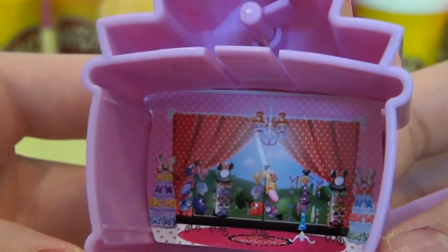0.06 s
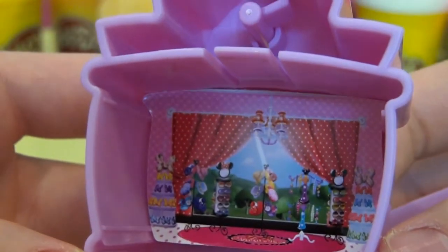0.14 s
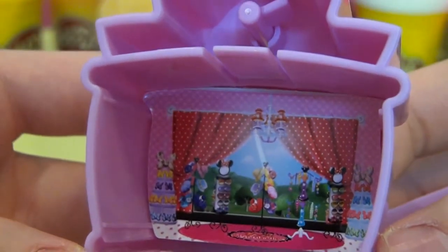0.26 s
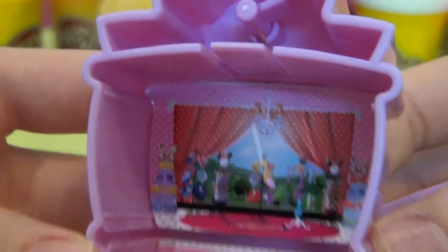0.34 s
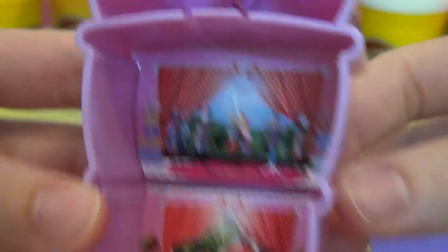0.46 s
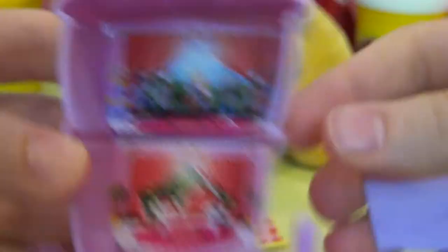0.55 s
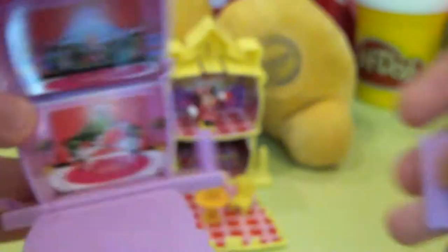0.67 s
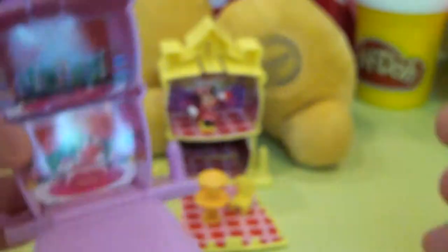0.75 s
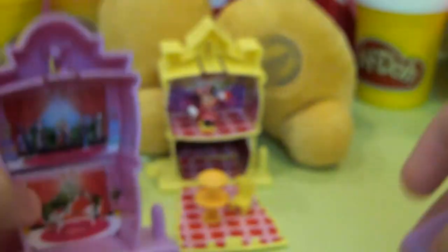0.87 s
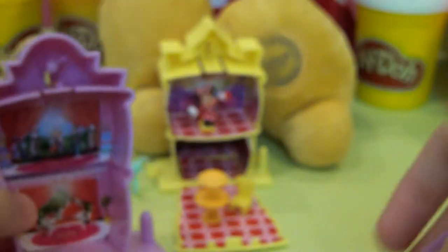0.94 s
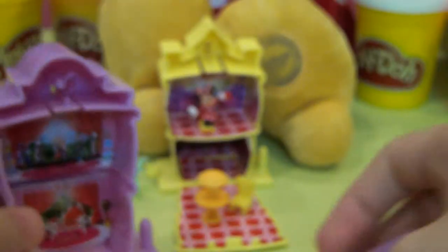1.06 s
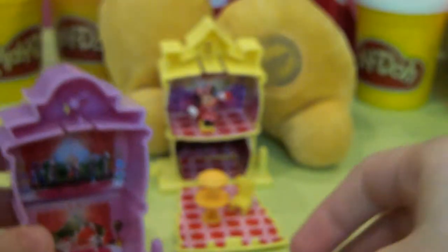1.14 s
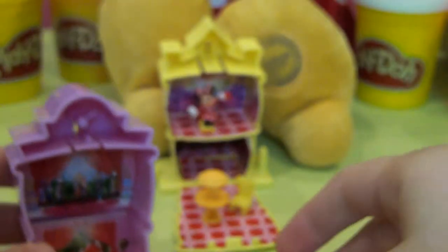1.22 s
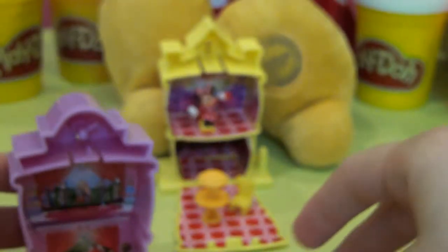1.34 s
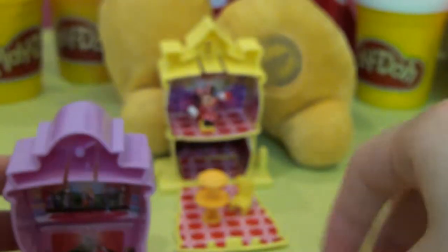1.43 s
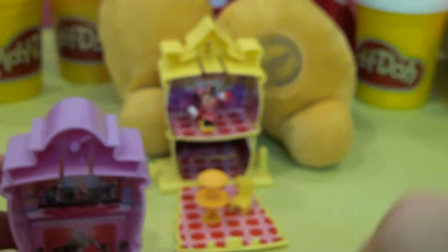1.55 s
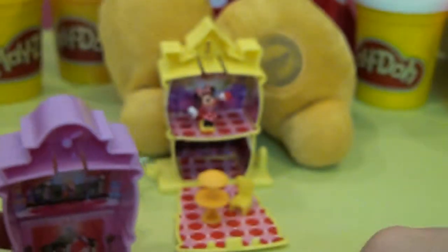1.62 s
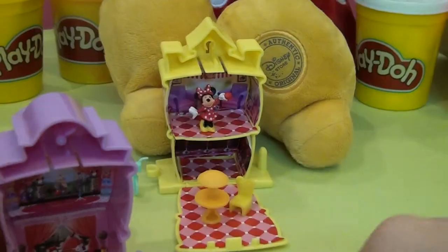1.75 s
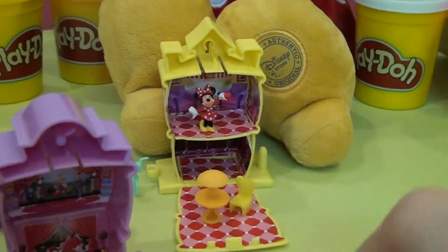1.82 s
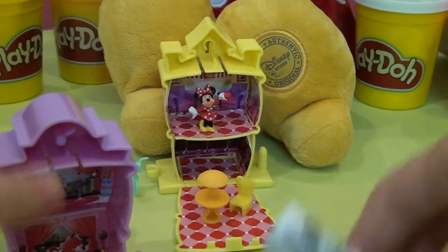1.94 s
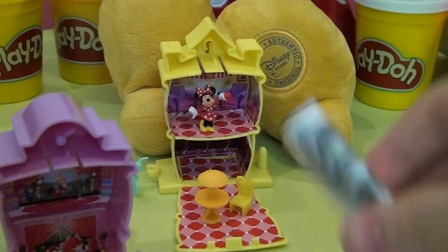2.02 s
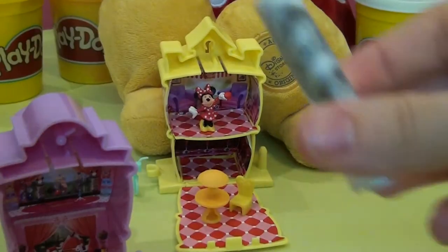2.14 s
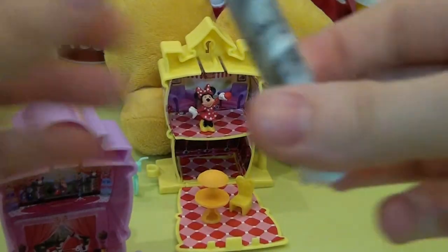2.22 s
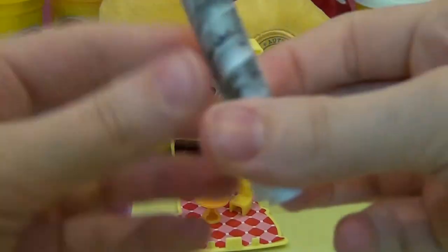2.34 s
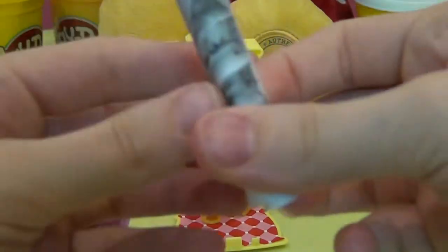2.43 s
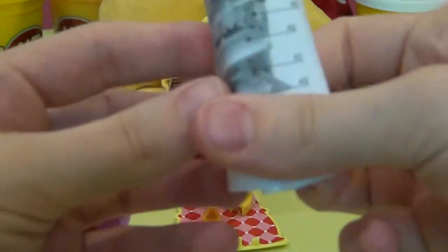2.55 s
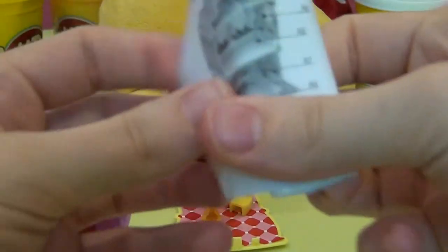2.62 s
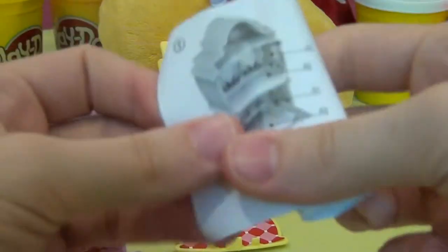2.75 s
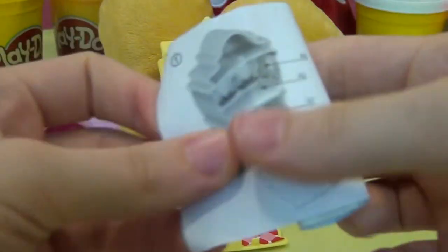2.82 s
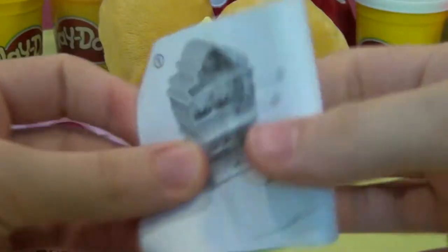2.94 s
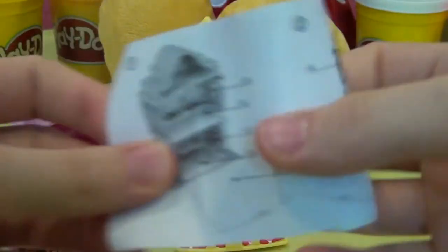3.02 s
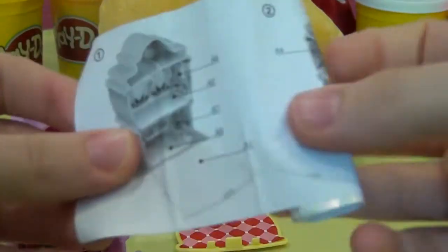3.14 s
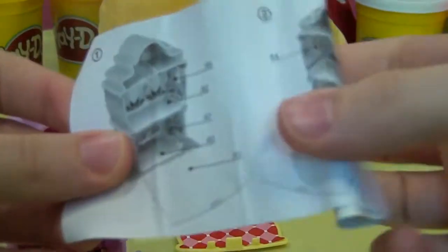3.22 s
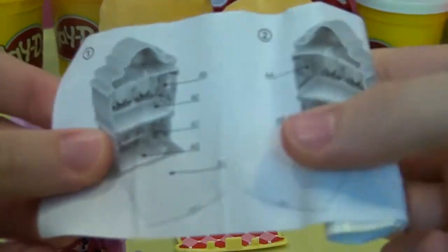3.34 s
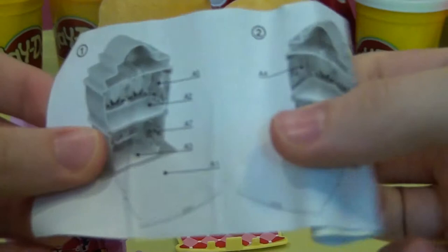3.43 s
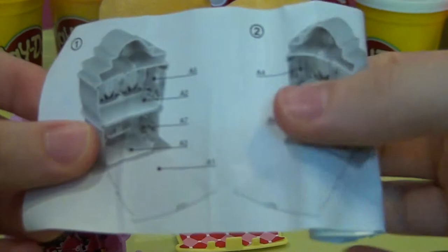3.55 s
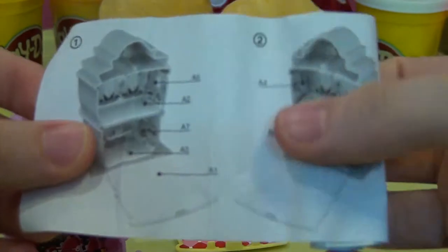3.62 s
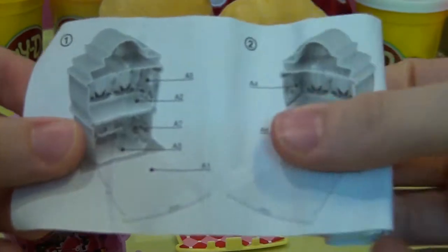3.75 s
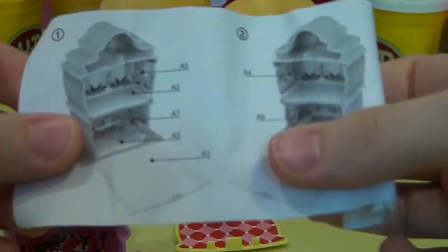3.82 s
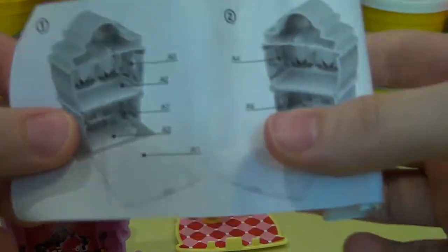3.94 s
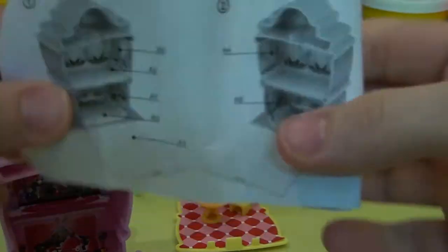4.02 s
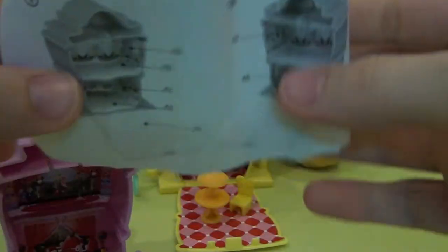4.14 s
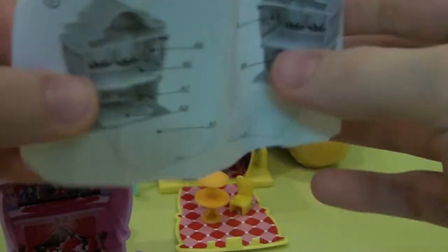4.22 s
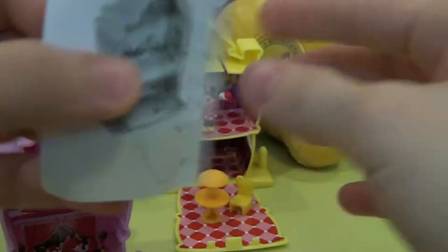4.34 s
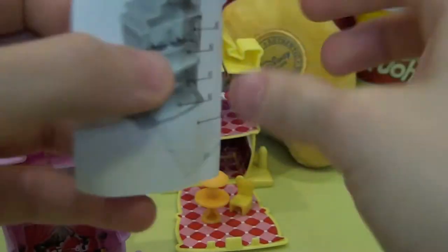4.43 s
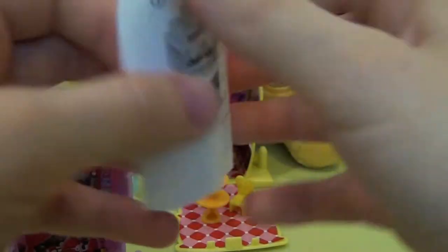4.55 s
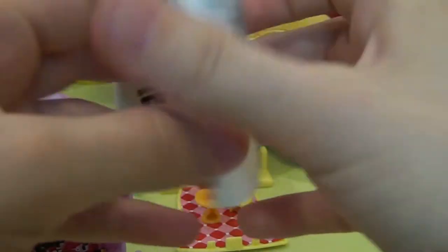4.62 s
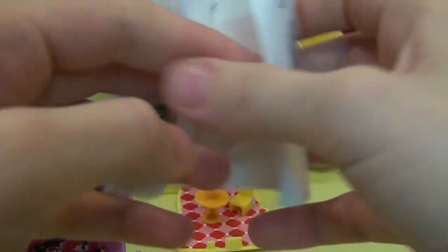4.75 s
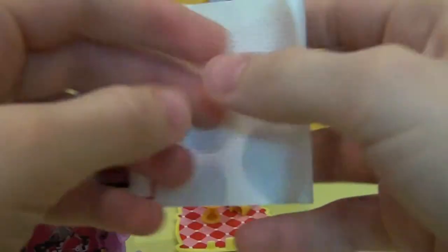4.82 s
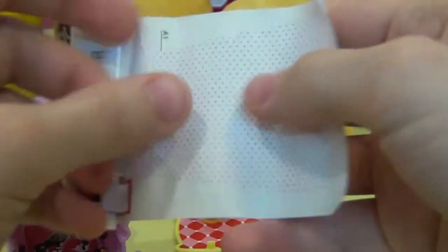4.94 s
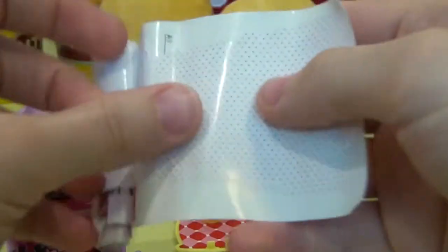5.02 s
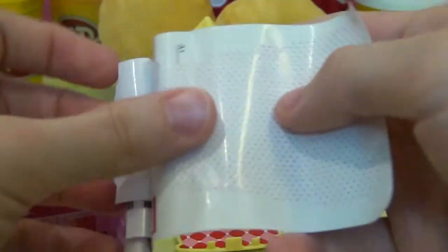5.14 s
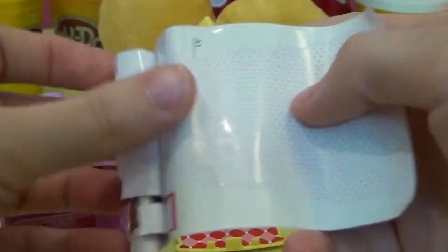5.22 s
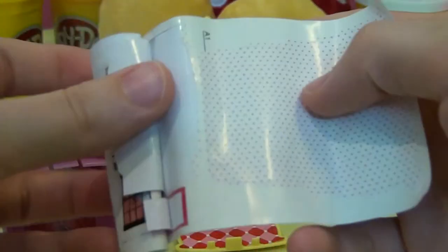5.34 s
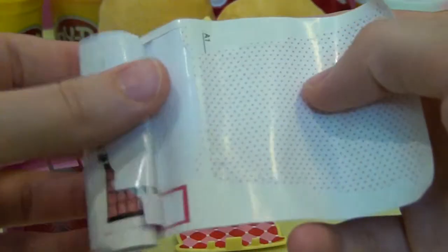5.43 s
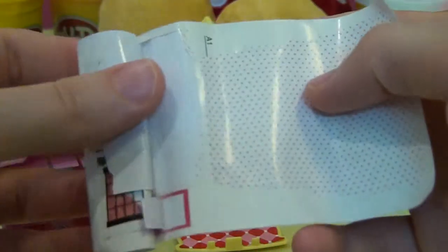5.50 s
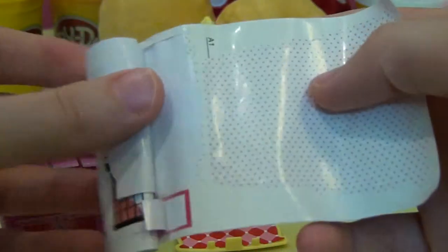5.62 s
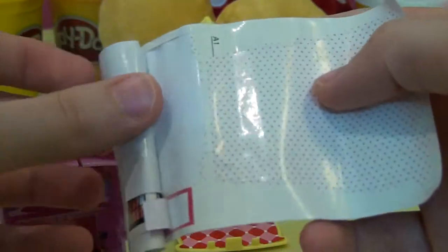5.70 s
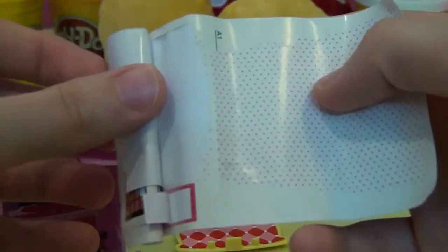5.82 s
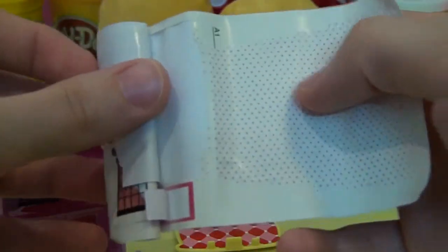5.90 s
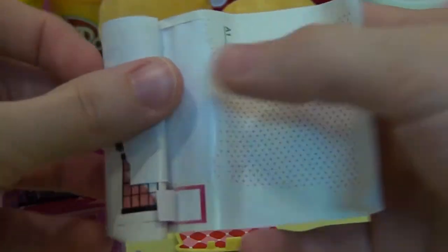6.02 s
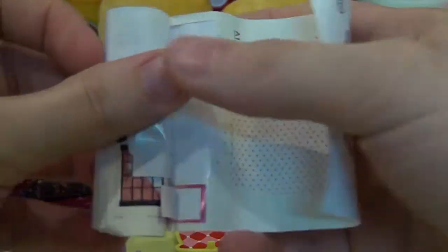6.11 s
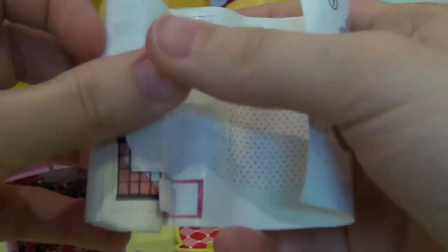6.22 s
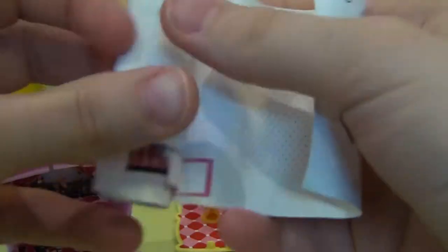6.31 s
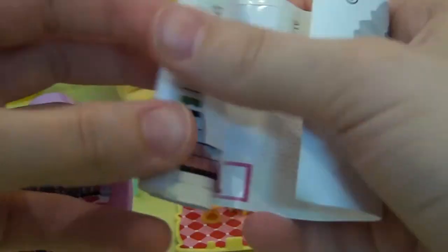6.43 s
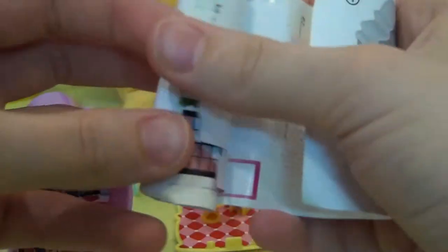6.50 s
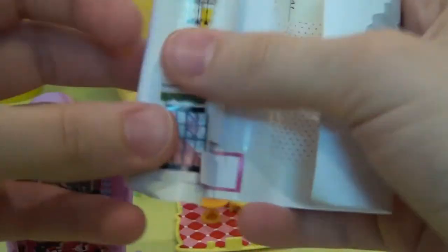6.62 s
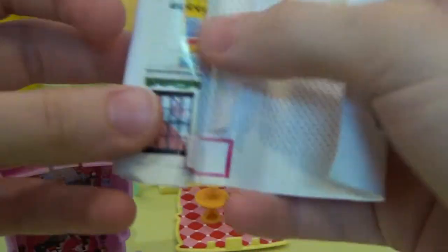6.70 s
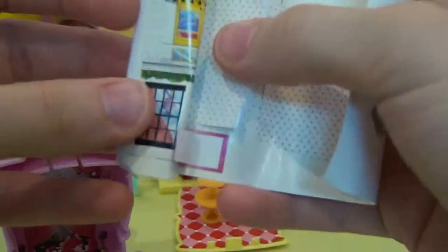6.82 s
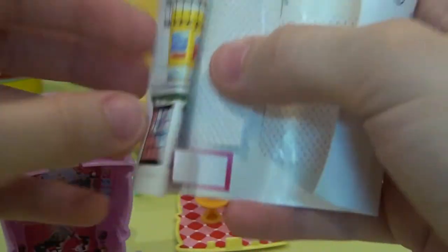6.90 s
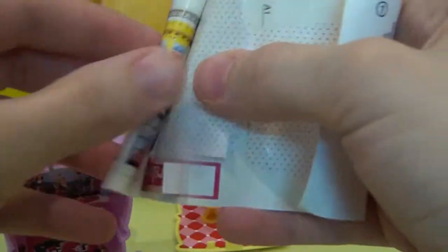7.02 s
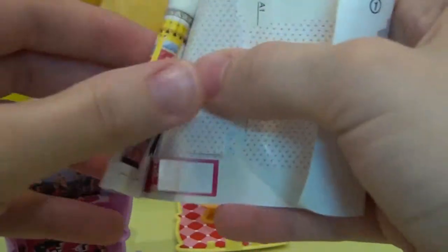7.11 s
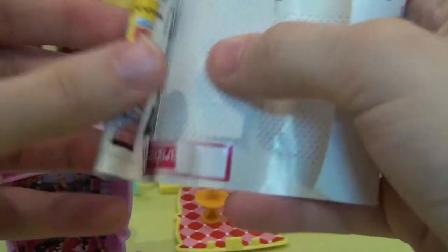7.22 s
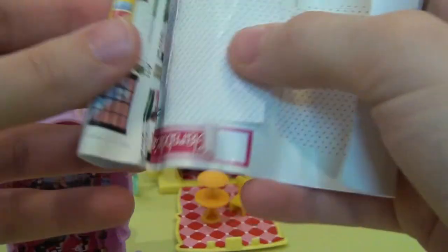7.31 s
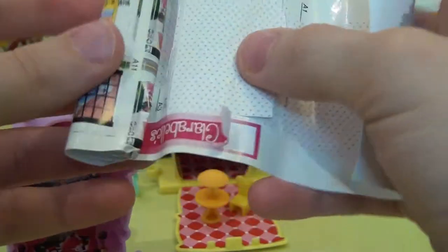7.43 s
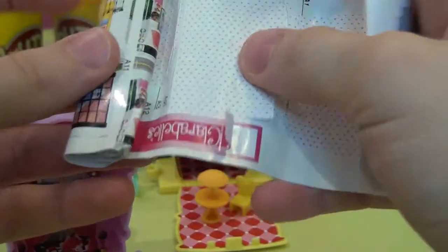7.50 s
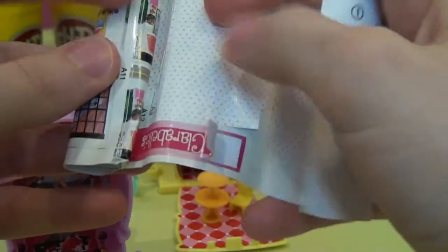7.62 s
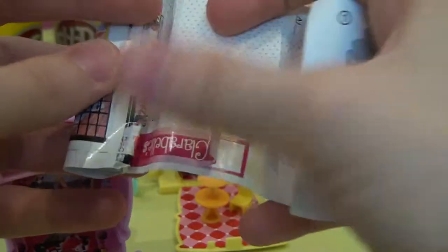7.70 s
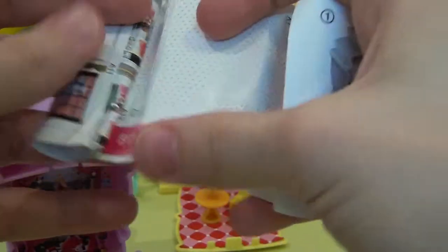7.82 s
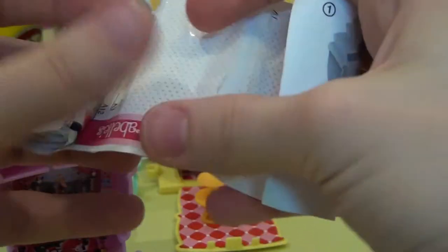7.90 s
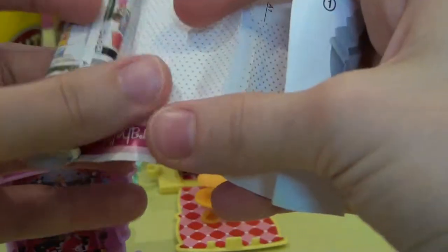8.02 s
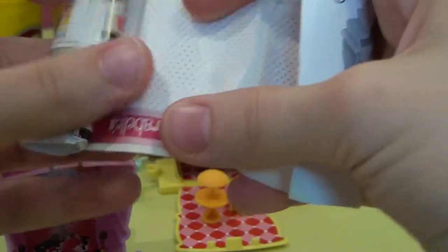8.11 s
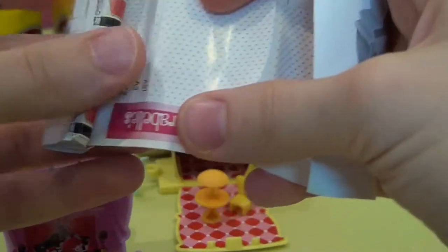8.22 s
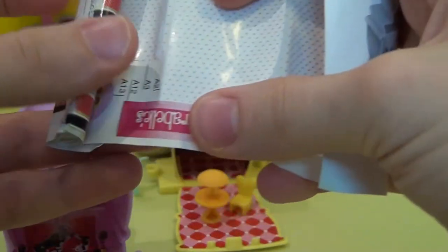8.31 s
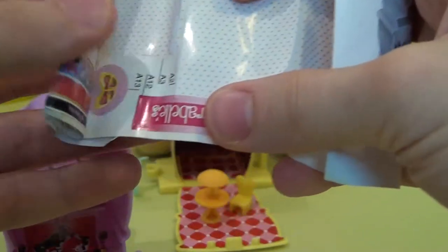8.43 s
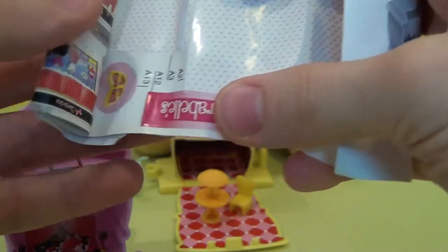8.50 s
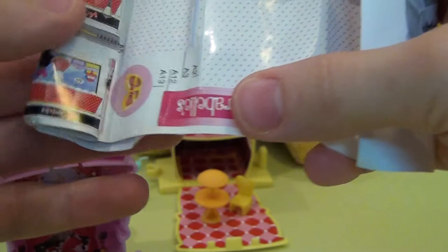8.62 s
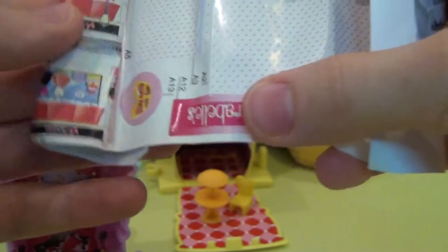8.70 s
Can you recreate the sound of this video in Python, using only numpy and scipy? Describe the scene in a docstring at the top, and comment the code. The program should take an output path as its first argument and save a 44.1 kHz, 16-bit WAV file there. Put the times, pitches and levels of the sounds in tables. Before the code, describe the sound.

Close handling sounds: faint plastic touches first, then a hard hollow clack and a cluster of rattles and scrapes as a small toy is set on a table. Next, stiff slick paper is unrolled and turned, crackling irregularly with bright pops, hissing finger slides and soft low flops until the end. Steady low room noise with hum and a thin high whine lies beneath; little reverberation.

```python
"""A quiet room, with a wavering low hum and a steady thin whine over smooth broadband noise.
Fingers shift on a hollow plastic toy, which is set down and pushed along a table: impacts excite the modes of
its shell, friction drags scrape and hum from it. Then fingers unroll a stiff paper sheet: buckling creases snap
and ring, skin and paper slide in hissing strokes made of many tiny slips, and the flopping sheet pushes air.
Small ticks sound throughout, and sparse dull echoes follow the near sources."""
import sys
import numpy as np
from scipy import signal
from scipy.io import wavfile
from scipy.ndimage import uniform_filter1d

SR = 44100
rng = np.random.default_rng(int(sys.argv[2]) if len(sys.argv) > 2 else 0)


def digitize_waveform(pressure):
    """Quantize a signal to 16-bit integers and store it at the path in sys.argv[1].

    Rows of a 2-D input are taken as channels; values are limited to [-1, 1].
    """
    field = np.atleast_2d(pressure).T
    bounded = np.clip(field, -1, 1)
    quanta = np.round(bounded * 32767).astype(np.int16)
    wavfile.write(sys.argv[1], SR, quanta)


N = 386316  # length in samples


def gain_of(db):
    """Decibel law: 20 dB is a factor of ten in amplitude."""
    return 10 ** (np.asarray(db) / 20)


def evened(x):
    """Normalisation to an rms of 1."""
    return x / np.sqrt(np.mean(x ** 2) + 1e-20)


def peaked(x):
    """Normalisation to a peak of 1."""
    return x / abs(x).max()


def add(mix, start_s, sound):
    """Superposition: the sound is added in place, cut at the end of the mix."""
    part = mix[round(start_s * SR):][:len(sound)]
    part += sound[:len(part)]


def bandpassed(x, order, edges_hz):
    """Band-pass filtering: only the part between two edges passes."""
    return signal.sosfilt(signal.butter(order, edges_hz, "bandpass", output="sos", fs=SR), x)


def read(points, hz):
    """Interpolation of a spectrum along a logarithmic frequency axis."""
    point_hz, value = np.transpose(points)
    return np.interp(np.log(hz + 1), np.log(point_hz + 1), value)


def colour(points):
    """Minimum phase: the Hilbert transform of the log spectrum gives a causal filter, here of energy 1."""
    hz = abs(np.fft.fftfreq(4096, 1 / SR))
    end = (points[-1][0] * 1.01, -90)  # the spectrum stops above its last point
    log_gain = np.log(gain_of(np.maximum(read(points + [end], hz), -90)))
    phase = -signal.hilbert(log_gain).imag
    taps = np.fft.ifft(np.exp(log_gain + 1j * phase)).real[:2048]
    return taps / np.linalg.norm(taps)


# spectrum of the room noise: pitch_hz [Hz], level_db [relative dB per Hz]
AIR_SPECTRUM = [(15, -43), (25, -18), (50, 0), (96, -4), (186, 4), (400, 2), (520, -4), (770, 0),
                (1700, -5), (2100, -5.5), (2900, -8.5), (5500, -9), (9300, -13.5), (15700, -17.5)]
# correlation of the room noise between left and right: pitch_hz [Hz], likeness [-1 to 1]
AIR_LIKENESS = [(60, 0.94), (180, 0.97), (550, 0.63), (1650, 0.72), (4970, 0.95), (15000, 1.0)]
# hum and whine: pitch_hz [Hz], level_db [dB rms]; the hum wavers about its level
TONES = [(59.2, -71.5), (118.4, -70), (2530, -63.5)]
AIR_DB = -55  # rms


def air():
    """Partial coherence: the channels share some of the room noise; a wavering hum and a steady whine join it."""
    frames, hz = N // 512 + 5, np.fft.rfftfreq(2048, 1 / SR)
    a, b, c, d = rng.standard_normal((frames, 1025, 4)).T
    left, other = a + 1j * b, c + 1j * d
    same = np.clip(read(AIR_LIKENESS, hz), -1, 1)[:, None]
    right = same * left + np.sqrt(1 - same ** 2) * other
    spectra = np.array([left, right]) * gain_of(read(AIR_SPECTRUM + [(15850, -80)], hz)[:, None])
    out = gain_of(AIR_DB) * evened(signal.istft(spectra, nperseg=2048, noverlap=1536)[1][:, :N])
    t = np.arange(N) / SR
    for pitch_hz, level_db in TONES:
        waver = evened(uniform_filter1d(rng.standard_normal(N), size=6000))
        waver_db = 2.3 * waver * (pitch_hz < 500)  # only the hum wavers
        tone = np.sin(2 * np.pi * (pitch_hz * t + rng.random()))
        out += np.sqrt(2) * gain_of(level_db + waver_db) * tone
    return out


def friction(per_s, spread_db, flutter_db, flutter_s, patchy_db):
    """Stick-slip: tiny uneven slips come in clumps; their colour drifts in patches as the contact moves."""
    clumps = evened(uniform_filter1d(rng.standard_normal(N), size=max(2, int(flutter_s * SR))))
    sizes = gain_of(spread_db * np.minimum(rng.exponential(1, N), 6) + flutter_db * clumps)
    slips = sizes * rng.standard_normal(N) * (rng.random(N) < per_s / SR)
    spectra = signal.stft(slips, nperseg=256)[2]
    patches = rng.standard_normal(spectra.shape[::-1]).T
    for _ in range(2):
        patches = uniform_filter1d(uniform_filter1d(patches, size=4, axis=0), size=9, axis=1)
    drift = uniform_filter1d(uniform_filter1d(patches, size=10, axis=0), size=30, axis=1)  # broad, slow
    spectra = spectra * gain_of(patchy_db * (evened(patches) + evened(drift)))
    return evened(signal.istft(spectra, nperseg=256)[1][:N])


def toy_friction():
    """Stick-slip of the toy's plastic surface."""
    return friction(per_s=24000.0, spread_db=2.5, flutter_db=2.5, flutter_s=0.005, patchy_db=2.5)


def slide(rows, slips, bodies, edge_db, fade_db_per_s, linger_db, pitch_share):
    """Source and filter: slips swell, stop and linger faintly; a narrow resonance at the row's pitch colours them."""
    out, t = np.zeros(N), np.arange(N) / SR
    for middle, rise, fall, hz, *dbs in rows:
        first = max(0, int((middle - rise - .2) * SR))
        part = slice(first, int((middle + fall + .2) * SR))
        now = t[part]
        place = (now - middle) / np.where(now < middle, rise, fall)  # -1 at the start, 1 at the end
        past = np.maximum(np.maximum(middle - rise - now, now - middle - fall), 0)  # s outside the stroke
        swell = gain_of(-edge_db * np.minimum(abs(place) ** 2.22, 1) - fade_db_per_s * past)
        shape = swell + gain_of(linger_db - np.where(place < 0, 600., 80.) * past)
        layers = []
        for db, slip, body in zip(dbs, slips, bodies):
            shaped = shape * slip[part]
            level = gain_of(db) * np.linalg.norm(shape) / np.linalg.norm(shaped)
            layers.append(signal.oaconvolve(level * shaped, body)[:len(past)])
        rustle, hiss, low = layers
        pitched = signal.lfilter(*signal.butter(1, [hz / 1.08, hz * 1.104], "bandpass", fs=SR), rustle)
        mixed = (1 - pitch_share) * rustle + pitch_share * pitched * np.std(rustle) / np.std(pitched)
        add(out, first / SR, mixed * np.std(rustle) / np.std(mixed) + hiss + low)
    return out


# modes of the shell (below 4500 Hz) and its small parts (above): pitch_hz [Hz], level_db [relative dB], t60_s [s]
TOY_MODES = [(336, -13, 0.68), (442, -5, 0.33), (473, -3.5, 0.18), (512, 5, 0.12), (580, -2.5, 0.08),
             (679, -2.5, 0.089), (785, 18, 0.013), (1293, 3.5, 0.031), (1700, -1, 0.024),
             (2250, 4.5, 0.047), (2800, 0.5, 0.026), (3845, -4.5, 0.041), (5195, 0, 0.066),
             (5700, 8, 0.0077), (7150, -8, 0.04), (7850, -9, 0.04), (8340, -7, 0.04), (9500, -13, 0.019)]


def toy_modes(t):
    """Modal decay: every mode is a damped sine; also tells which modes belong to the small parts."""
    modes = [gain_of(db - 60 * t / t60) * np.sin(2 * np.pi * hz * t) for hz, db, t60 in TOY_MODES]
    small = [hz > 4500 for hz, db, t60 in TOY_MODES]
    return np.array(modes), np.array(small)


# spectrum of plastic scraping: pitch_hz [Hz], level_db [relative dB per Hz]
SCRAPE = [(710, -21), (1250, -1), (2210, -4), (2570, -1.5), (3000, -6.5), (3700, -7.5), (4700, -8),
          (6300, -10), (8000, -40)]
# spectrum of bright hiss, for the toy and the paper: pitch_hz [Hz], level_db [relative dB per Hz]
HISS = [(4500, -36), (6500, -11.5), (8500, 1), (10300, -4), (11500, -12), (12400, -17.5), (14500, -13),
        (15700, -14)]
# fingers on the lifted toy: middle_s [s], half_length_s [s], pitch_hz [Hz], scrape_db [dB], shell_hum_db [dB]
TOUCHES = [(0.365, 0.018, 5030, -57, -69), (0.535, 0.0088, 3530, -54.5, -72.5),
           (0.678, 0.013, 5940, -56.5, -76), (0.71, 0.011, 1700, -52.5, -77),
           (0.885, 0.022, 1600, -58, -52.5)]
TOUCH_HISS_DB, TOUCH_HISS_PER_OCTAVE = -4.5, 3.6  # over the scrape; low touches hiss less
RUSTLE_HZ = 2595  # narrow resonance shared by all paper strokes; the touches' hiss is set relative to its octave


def touches():
    """Light damping: fingers shift on the toy held in the hand, where only its lowest mode hums."""
    t = np.arange(6000) / SR
    a, b = toy_friction(), toy_friction()
    free = toy_modes(t)[0][0] * gain_of(-60 * t / 0.088)
    bodies = colour(SCRAPE), colour(HISS), free / np.linalg.norm(free)
    rows = []
    for middle, half, hz, scrape_db, hum_db in TOUCHES:
        hiss_db = scrape_db + TOUCH_HISS_DB + TOUCH_HISS_PER_OCTAVE * np.log2(hz / RUSTLE_HZ / 2)
        rows.append((middle, half, half, hz, scrape_db, hiss_db, hum_db))
    return slide(rows, (a, a, b), bodies, edge_db=18.0, fade_db_per_s=520.0, linger_db=-33.0, pitch_share=0.96)


# edges and fingertips that let go: start_s [s, sounded 0.4 ms early], level_db [dB peak of pitched part], pitch_hz [Hz]
TICKS = [(.857, -39, 7800), (2.091, -34, 8800), (2.806, -33, 3000), (2.814, -38, 8000), (2.827, -33, 2500),
         (2.996, -33.5, 2620), (3.872, -30, 4500), (4.034, -29.5, 2700), (4.071, -27, 2720),
         (6.956, -33, 900), (2.565, -39, 8000), (2.638, -36, 5200), (2.650, -28, 8500), (2.663, -42, 6500),
         (2.745, -33, 900), (2.821, -34, 8000), (2.833, -33.5, 2520), (2.935, -32.5, 2200),
         (3.671, -27.5, 2690), (4.3, -29, 2000), (4.503, -40, 4020), (4.617, -38, 8000),
         (4.669, -36.5, 2480), (4.69, -40, 4000), (4.718, -35, 2500), (4.73, -37, 5000), (4.757, -33, 4940),
         (4.878, -37, 1870), (5.311, -33, 9000), (5.468, -33, 7000), (5.998, -33, 2520), (6.074, -24, 875),
         (6.375, -35, 5000), (7.241, -34.5, 4500), (7.47, -29.5, 3540), (7.593, -33, 2190),
         (7.786, -33, 3200), (7.815, -34, 2900)]
TICK_S, TICK_OCTAVES, TICK_WIDE_DB = 0.0082, 1.06, -6  # t60 in s, width of the pitch, broad part over the peak


def ticks():
    """Impulsive release: short bursts of grit around a pitch, with a weaker broad click."""
    out, t = np.zeros(N), np.arange(600) / SR
    for (start_s, level_db, hz), grit in zip(TICKS, rng.standard_normal((len(TICKS), len(t)))):
        burst = grit * gain_of(-60 * t / TICK_S)
        edges_hz = hz * 2 ** (TICK_OCTAVES * np.array([-.5, .5]))
        pitched = signal.lfilter(*signal.butter(2, edges_hz, "bandpass", fs=SR), burst)
        click = peaked(np.diff(burst, prepend=0))
        add(out, start_s - .0004, gain_of(level_db) * (peaked(pitched) + gain_of(TICK_WIDE_DB) * click))
    return out


# spectrum of a knock's bright tick: pitch_hz [Hz], level_db [relative dB per Hz]
CRACK = [(1500, 0), (2940, 3), (5000, -15), (7280, 4.5), (8560, 3), (11000, 1.5), (12300, -19), (14200, -8),
         (15700, -10), (16800, -40)]
# toy meets table: start_s [s], and peaks before the bass cut: knock_db [dB], tick_db [dB], rattle_db [dB]
KNOCKS = [(1.2612, -5, -11, -23.5), (1.311, -24, -18, -32), (1.358, -20.5, -27, -39),
          (1.39, -27, -5.5, -41), (1.4067, -23, -6.5, -15), (1.425, -17, -20, -20), (1.447, -38, -31, -13),
          (1.453, -15.5, -18, -31), (1.458, -39, -27, -11), (1.465, -18, -27, -28), (1.469, -45, -6, -15),
          (1.488, -50, -38, -16), (1.507, -37, -28, -18), (1.525, -26, -40, -20), (1.578, -10, -35, -40),
          (1.589, -12, -10.5, -31), (1.612, -11.5, -42, -45), (1.876, -51, -23.5, -58)]


def knocks():
    """Impact excitation: each knock rings the shell, ticks, and rattles the small parts."""
    t = np.arange(6000) / SR
    modes, small = toy_modes(t)
    out, bright = np.zeros(N), colour(CRACK)
    spots = gain_of(2.5 * rng.standard_normal((len(KNOCKS), len(TOY_MODES))))  # each knock lands on another spot
    grits = rng.standard_normal((len(KNOCKS), 600))
    for (start_s, knock_db, tick_db, rattle_db), spot, grit in zip(KNOCKS, spots, grits):
        short = grit * gain_of(-60 * t[:600] / 0.0085)
        long = grit * gain_of(-60 * t[:600] / 0.015)
        add(out, start_s, gain_of(knock_db) * peaked((spot * ~small) @ modes))
        add(out, start_s, gain_of(tick_db) * peaked(signal.oaconvolve(bright, short)))
        add(out, start_s, gain_of(rattle_db) * peaked(signal.oaconvolve((spot * small) @ modes, long)))
    return out


# base shoved along the table, level curves: time_s [s], scrape_db [dB], hiss_db [dB], shell_hum_db [dB]
DRAG = [(1.265, -56, -59, -21), (1.3, -37, -60, -35), (1.33, -31.5, -52, -25), (1.352, -40.5, -56, -41),
        (1.4, -46, -47, -28.5), (1.435, -35, -30, -28), (1.455, -22.5, -24, -29), (1.485, -33, -34, -34),
        (1.51, -32, -29, -29.5), (1.565, -42.5, -50.5, -35.5), (1.588, -24.5, -40, -23.5),
        (1.63, -39.5, -44, -27), (1.655, -43, -59, -28), (1.685, -34.5, -32, -34.5),
        (1.722, -33.5, -29, -37), (1.744, -46, -42, -32.5), (1.815, -56, -57, -52.5),
        (1.828, -39.5, -42, -42.5), (1.842, -36.5, -37.5, -46), (1.868, -53, -51, -58)]


def drag():
    """Contact damping: scrape, hiss and hum swell and sink; pressed on the table, the shell is damped."""
    t = np.arange(6000) / SR
    modes, small = toy_modes(t)
    shell = ~small @ modes * gain_of(-60 * t / 0.029)
    a, b = toy_friction(), toy_friction()
    bodies = colour(SCRAPE), colour(HISS), shell / np.linalg.norm(shell)
    time_s, *dbs = np.transpose(DRAG)
    out, t = np.zeros(N), np.arange(N) / SR
    for db, slip, body in zip(dbs, (a, b, b), bodies):
        level = gain_of(np.interp(t, time_s, db, -120, -120))
        out += signal.oaconvolve(level * slip, body)[:N]
    return out


# creases that buckle: start_s [s, sounded 0.4 ms early], level_db [dB, reference of the parts],
# pitch_hz [Hz, ring of the patch], then over the reference: thud_db [dB], crack_db [dB], top_db [dB]
SNAPS = [(2.317, -17, 8450, -13, -13.5, -31), (2.4223, -15, 4900, -11, -13, -29.5),
         (2.472, -19, 2270, -17, -30, -28), (2.6845, -21, 5770.0, -8, -6, -25),
         (2.91, -23, 4130, -15, -18, -33.6), (3.115, -26.5, 8560, -8.5, -8, -16),
         (3.217, -11, 4170, -33, -22, -38), (3.2173, -7, 1370, -9, -22, -44),
         (3.2832, -20, 2500, -17, -9.5, -22.8), (3.3026, -24, 2630.0, -3.5, -10, -19.1),
         (3.3251, -24.5, 8290.0, -4, -5, -23.2), (3.346, -26, 6330, -2.5, -2.5, -24.3),
         (3.3652, -26, 2710.0, -12, -18, -21.6), (3.419, -27, 2630.0, -9, -11.9, -27.8),
         (3.462, -18, 2900, -36, -6, -23), (3.5107, -19, 7900, -38, -1.5, -12),
         (3.5303, -24.5, 5300, -32, -22, -17), (3.697, -15, 4940, -27, -12, -17),
         (3.7448, -13, 6250, -20, 5, -5), (3.7922, -23, 1400, -28, -19, -24.0),
         (3.9, -3.5, 2500, -24, -6.5, -24), (3.9235, -23, 2700, -12.8, -7, -21),
         (4.0506, -26.5, 1370, -18, -5, -23.7), (4.3158, -6, 5100, -25, -12.5, -36),
         (4.3456, -19.5, 2330, -28, -14, -24), (4.3912, -7, 5400, -15, -8, -34),
         (4.398, -19.5, 2500, -9, -17, -24), (4.42, -23, 5260, -17, -6, -26),
         (4.5766, -26, 2860.0, -5.5, -5, -33), (4.862, -10, 1350, -13.5, -104, -47.5),
         (4.9325, -3, 1650, -24.5, -28, -37), (4.9713, -25, 5900, -7, -7, -21),
         (5.004, -8, 3080, -15, -14, -38), (5.0818, -25.5, 7710.0, -7.5, -3, -24.2),
         (5.1472, -20, 8800, -12, 10, -11), (5.2037, -12.5, 900, -21, -1, -17),
         (5.2042, -2, 3900, -31.5, -13, -29), (5.3017, -19, 8900, -16, -11, -32),
         (5.6697, -16, 8400, -21, -15, -19), (5.675, -25, 2870, -5.5, 6.5, -6),
         (5.935, -23, 5340, -17, -9, -23), (6.0776, -28, 1250, -3, -32, -49),
         (6.1589, -9.5, 4720, -13.5, -41, -45), (6.1582, -4, 1210, -17, -38, -46.6),
         (6.2777, -13, 9000, -12.5, -14, -18), (6.4688, -25, 8400.0, -32, -3, -8),
         (6.5758, -19, 2600, -34, -8, -9), (6.89, -19, 800, -16, -17, -35.1),
         (6.8985, -13.5, 3180, -30, -19, -25), (6.9305, -9, 2850, -19, -29, -43.6),
         (7.2, -31.5, 8800, -27.3, -1.5, -11), (7.6448, -26.5, 2630, -6, -4, -19.3),
         (7.7406, -24, 2180, -22, -18, -38), (7.85, -21.5, 4700, -12, -3, -12),
         (7.9025, -13.5, 8700, -53, -25, -18), (7.913, -7, 2010, -34, -10.5, -23),
         (8.094, -17.5, 4940, -35, -5, -20), (8.114, -4, 2290, -17.5, -7, -13),
         (8.234, -25.5, 744, -22, -10, -22.4), (8.254, -20, 5550, -36, -8.5, -23),
         (8.2635, -15, 790, -14, -68, -39.4)]
RING_DB, SNAP_DB = -7.5, -4.5  # over the reference
RING_S, RING_CYCLES = .004, 1.5  # t60 of the patch: seconds plus cycles of its pitch
SNAP_PER_CRACK = 0.15  # dull buckles snap less


def snaps():
    """Buckling: a few quick jolts, heard from thud to thin crack, also ring the patch for some cycles."""
    out, t = np.zeros(N), np.arange(900) / SR
    noise = rng.standard_normal((len(SNAPS), 3, len(t)))
    start = 1 - np.exp(-t / 0.000089)
    for (start_s, level_db, hz, thud_db, crack_db, top_db), (push, jolts, grit) in zip(SNAPS, noise):
        ring = start * gain_of(-60 * t / (RING_S + RING_CYCLES / hz)) * np.sin(2 * np.pi * hz * t)
        # the ring carries little below its pitch
        ring = signal.lfilter(*signal.butter(2, hz / 1.5, "highpass", fs=SR), ring)
        thud = bandpassed(push * gain_of(-60 * t / 0.0097), 2, [150, 1300])
        # low rings go with dull snaps
        snap_hz = [np.clip(0.6 * hz, 900, 3000), np.clip(2.3 * hz, 2800, 7000)]
        snap = bandpassed(jolts * start * gain_of(-60 * t / 0.0098), 3, snap_hz)
        grit = grit * start * gain_of(-60 * (t / 0.0088) ** 1.06)
        crack = bandpassed(grit, 4, [6500, 11500])
        top = bandpassed(grit, 4, [12500, 16500])
        dbs = RING_DB, thud_db, SNAP_DB + SNAP_PER_CRACK * crack_db, crack_db, top_db
        parts = ring, thud, snap, crack, top
        buckle = sum(gain_of(over) * peaked(part) for over, part in zip(dbs, parts))
        add(out, start_s - .0004, gain_of(level_db) * buckle)
    return out


TRAIL_DB, TRAIL_S, TRAIL_DB_PER_OCTAVE = -26, .24, -7  # level at 1500 Hz over the buckle, t60 in s, slope


def trails():
    """Residual vibration: after a buckle the patch quivers on, large patches more, a faint rough ring."""
    out, t = np.zeros(N), np.arange(6000) / SR
    for (start_s, level_db, hz, *_), shake in zip(SNAPS, rng.standard_normal((len(SNAPS), len(t)))):
        ring = signal.lfilter(*signal.butter(2, [hz / 1.2, hz * 1.22], "bandpass", fs=SR), shake)
        trail_db = level_db + TRAIL_DB + TRAIL_DB_PER_OCTAVE * np.log2(hz / 1500)
        add(out, start_s, gain_of(trail_db - 60 * t / TRAIL_S) * peaked(ring))
    return out


def crackle(per_s, spread_db):
    """Random impulses: sparse tiny ticks of fibres and edges that let go."""
    sizes = gain_of(spread_db * np.minimum(rng.exponential(1, N), 4))
    return evened(sizes * rng.choice([-1., 1.], N) * (rng.random(N) < per_s / SR))


FLAP_DB, FLAP_FOLLOWS, FLAP_PER_HISS = -55, 0.5, -0.74  # at a -45.5 dB stroke; dB per dB of rustle, of hiss
STOP_SHORT = 0.067  # strokes swell longer than they fall


def stroke_row(middle, half, rustle_db, hiss_db):
    """Coupled radiation: the sheet flaps less under light, hissy strokes."""
    flap_db = FLAP_DB + FLAP_FOLLOWS * (rustle_db + 45.5) + FLAP_PER_HISS * hiss_db
    rise, fall = half * (1 + STOP_SHORT), half * (1 - STOP_SHORT)
    return middle, rise, fall, RUSTLE_HZ, rustle_db, rustle_db + hiss_db, flap_db


# spectra of the paper's rustle and of the flapping sheet: pitch_hz [Hz], level_db [relative dB per Hz]
RUSTLE = [(700, -46.5), (1200, -2), (1900, -0.5), (2630, 0), (3500, -2.5), (5050, 3.5), (6800, -4.5),
          (8000, -64)]
FLAP = [(30, -19), (70, -10.5), (200, -7.5), (500, -6), (1000, -6.5), (1500, -10.5), (2500, -42)]
# fingers slide on the sheet: middle_s [s], half_length_s [s], rustle_db [dB], hiss_db [dB over the rustle]
STROKES = [(2.436, 0.018, -51, 7.5), (2.482, .013, -44.5, -2), (2.512, 0.02, -37, 1.5),
           (2.598, 0.0065, -46.5, -4), (2.626, 0.0036, -42.5, -3.5), (2.671, 0.024, -46, -5),
           (2.71, 0.033, -44.5, 0), (2.762, 0.028, -46.5, -1), (2.88, 0.021, -45, -3),
           (3.036, 0.094, -48.5, 0), (3.088, 0.015, -40, 2), (3.158, 0.062, -50, -8),
           (3.3, 0.078, -45.5, -3), (3.405, 0.014, -48, -5), (3.491, 0.075, -48, 0.5),
           (3.749, 0.035, -44, -2), (3.815, 0.015, -43.5, 8), (3.877, 0.044, -43.5, 0),
           (3.927, 0.011, -35, -6.5), (4.055, 0.011, -39.5, -10), (4.09, 0.0066, -36, 0),
           (4.129, 0.0094, -35, 2.5), (4.317, 0.0046, -23.5, -7.5), (4.393, 0.0045, -29, -6.5),
           (4.527, 0.02, -46, 5.5), (4.593, 0.014, -43, -3), (4.794, 0.045, -45.5, -2.5),
           (5.009, 0.0081, -31, 0), (5.028, .014, -46, 2), (5.074, 0.017, -49.5, 1),
           (5.135, 0.025, -39.5, -3), (5.27, 0.079, -43.5, -3.5), (5.452, 0.023, -48.5, 1),
           (5.89, 0.012, -48, -5), (5.942, 0.0043, -50, -11), (6.107, 0.14, -46, -4.5),
           (6.29, 0.058, -47, -3.5), (6.421, 0.065, -43, -4), (6.593, 0.067, -50.5, -1.5),
           (6.727, 0.07, -47, -1), (6.903, 0.11, -55.5, -5), (7.004, 0.026, -46.5, 3.5),
           (7.041, 0.012, -46.5, -0.5), (7.248, 0.0074, -47, -2), (7.352, 0.025, -48, 7),
           (7.425, 0.072, -51.5, 4.5), (7.597, 0.056, -48.5, -7), (7.63, 0.015, -41.5, -2.5),
           (7.917, 0.16, -50, -4), (8.082, 0.016, -38.5, -9), (8.116, 0.018, -42, -9),
           (8.145, 0.0074, -38.5, -12), (8.156, .01, -47, 4), (8.31, 0.011, -50, -1.5),
           (8.414, 0.02, -46.5, -9), (8.709, 0.019, -41.5, -4), (8.744, 0.012, -38.5, -3.5)]
FLUTTER_DB = 2.6  # unevenness of a stroke


def strokes():
    """Sliding friction with fine ticks: rustle and hiss share slips in part, the sheet flaps on its own."""
    a, b, c = (friction(per_s=25000., spread_db=2.0, flutter_db=FLUTTER_DB, flutter_s=0.006, patchy_db=2.0)
               for _ in range(3))
    fine = 0.4 * crackle(per_s=900., spread_db=3.)
    slips = evened(a + fine), -evened(a + .5 * b + fine), c
    bodies = colour(RUSTLE), colour(HISS), colour(FLAP)
    rows = [stroke_row(*row) for row in STROKES]
    return slide(rows, slips, bodies, edge_db=14.5, fade_db_per_s=1500., linger_db=-19.5, pitch_share=.3)


# the sheet flops over: start_s [s], pitch_hz [Hz], level_db [dB peak before the left-right balance]
FLOPS = [(2.65, 203, -37), (3.105, 90, -37.5), (3.301, 272, -37), (4.387, 172, -28.5), (4.397, 152, -37),
         (5.002, 115, -43), (5.938, 112, -39), (8.107, 310, -34), (8.411, 150, -46), (8.75, 302, -37)]
FLOP_CYCLES = 1.28


def flops():
    """Air displacement: the whole sheet pushes a few soft low cycles of pressure."""
    out = np.zeros(N)
    for start_s, hz, level_db in FLOPS:
        turns = np.arange(0, 4 * FLOP_CYCLES, hz / SR)
        pulse = turns * np.exp(-4 * turns / FLOP_CYCLES) * np.sin(2 * np.pi * turns)
        add(out, start_s, gain_of(level_db) * peaked(pulse))
    return out


def room(x, t60, damp):
    """Reverberation: sparse echoes of random sign, duller than the source, unlike in the two channels."""
    t = np.arange(SR // 3) / SR
    echoes = rng.choice([-1., 1.], (2, len(t))) * (rng.random((2, len(t))) < .05)
    taps = echoes * (t > .002) * gain_of(-60 * t / t60)
    taps = signal.lfilter([1], [1, -np.clip(damp, 0, .95)], taps)
    return signal.oaconvolve(x[None], taps / np.linalg.norm(taps[0]), axes=1)[:, :N]


def scene():
    """Superposition: near sources, their echoes, flops stronger on the right, and the room noise."""
    toy = touches() + knocks() + drag()
    plastic = signal.lfilter(*signal.butter(3, 140., "highpass", fs=SR), toy)  # the toy's sounds carry no deep bass
    near = plastic + ticks() + snaps() + trails() + strokes()
    echoes = gain_of(-18.5) * room(near, t60=0.093, damp=0.57)
    balance_db = [[-1.2], [1.2]]  # left, right
    return near + echoes + gain_of(balance_db) * flops() + air()


EDGE_HZ = 16900


def record(dry):
    """Band limiting: a linear-phase low-pass ends the spectrum near EDGE_HZ."""
    taps = signal.firwin(511, EDGE_HZ, window=("kaiser", 9), fs=SR)
    return signal.oaconvolve(dry, taps[None], "same")


dry = scene()
out = record(dry)
digitize_waveform(out)
```